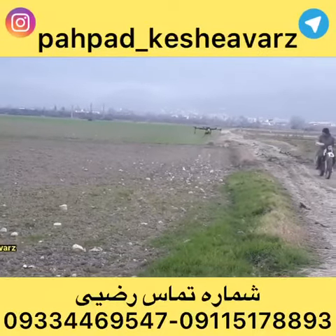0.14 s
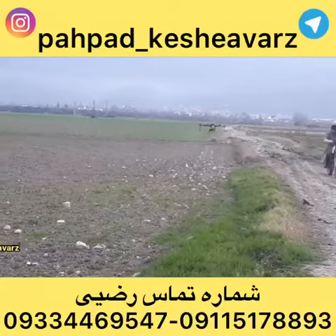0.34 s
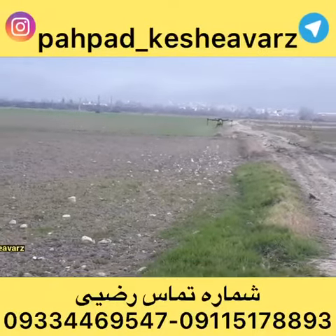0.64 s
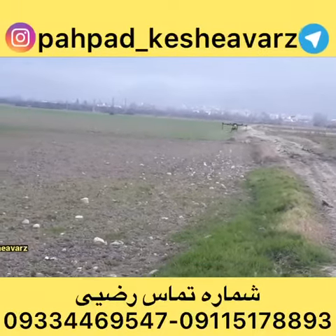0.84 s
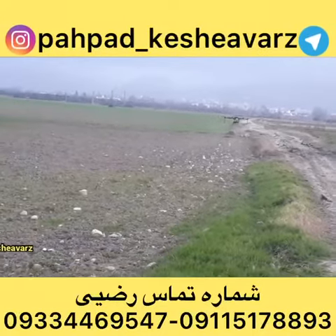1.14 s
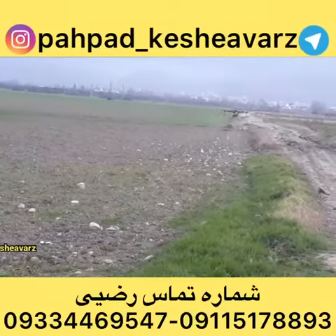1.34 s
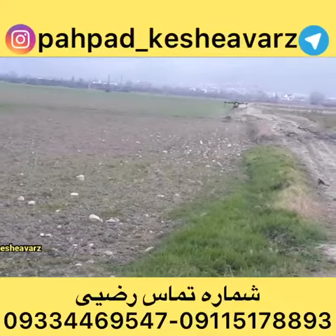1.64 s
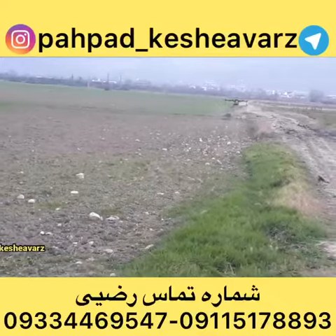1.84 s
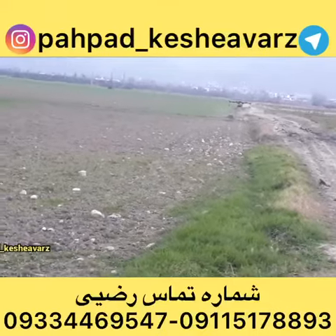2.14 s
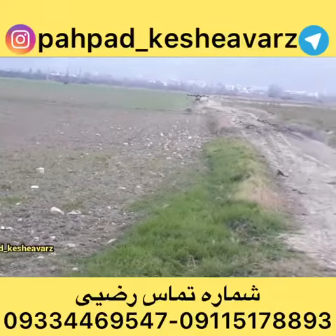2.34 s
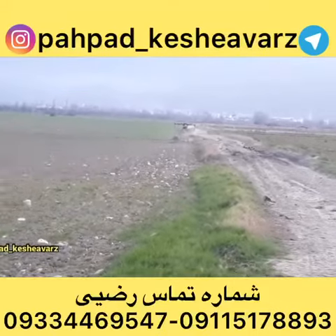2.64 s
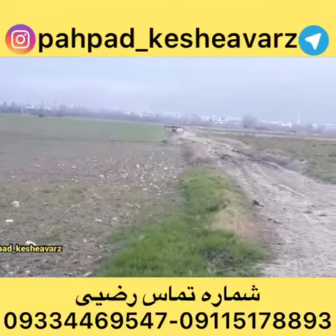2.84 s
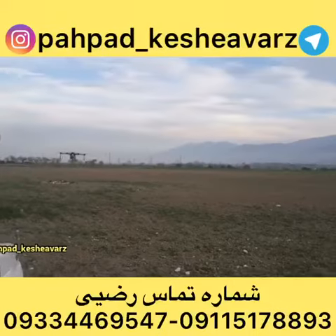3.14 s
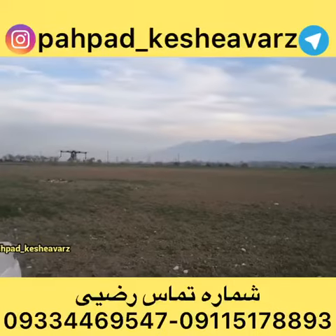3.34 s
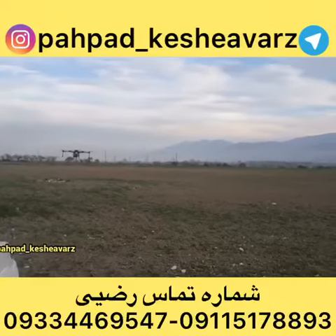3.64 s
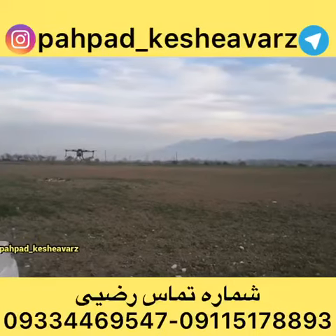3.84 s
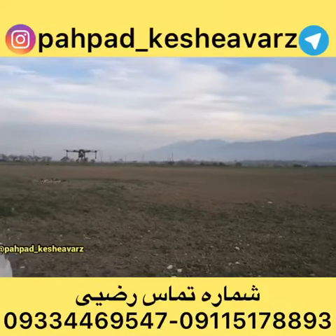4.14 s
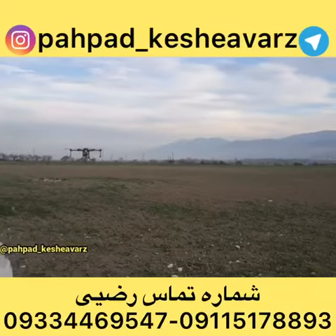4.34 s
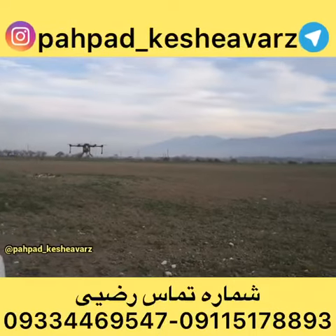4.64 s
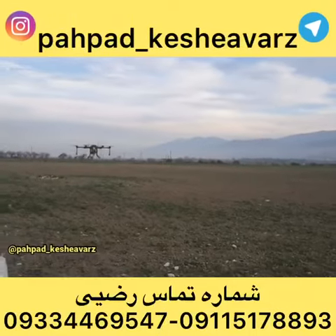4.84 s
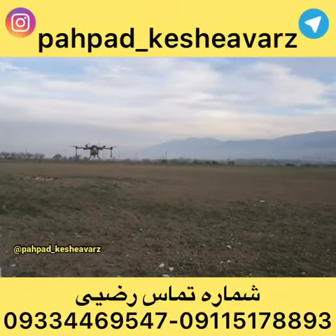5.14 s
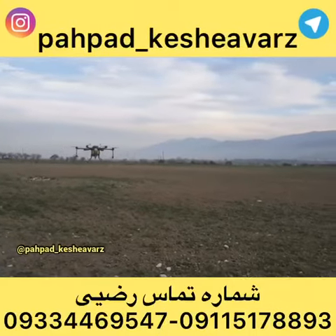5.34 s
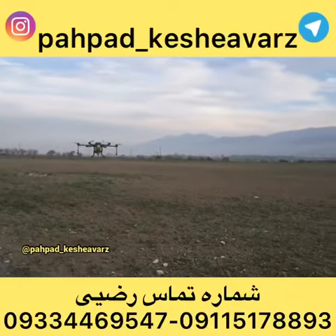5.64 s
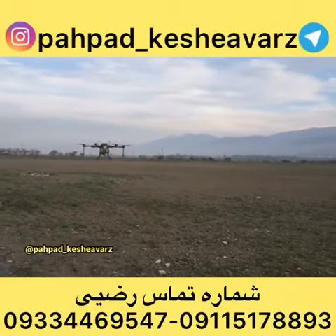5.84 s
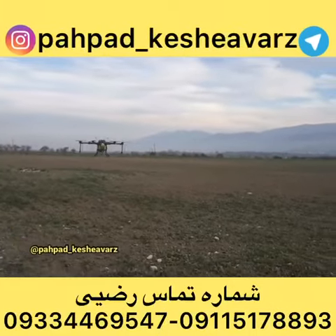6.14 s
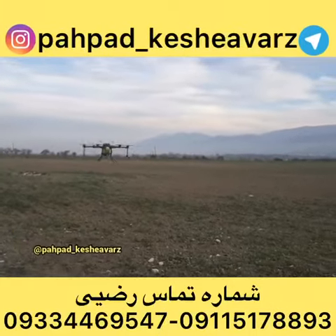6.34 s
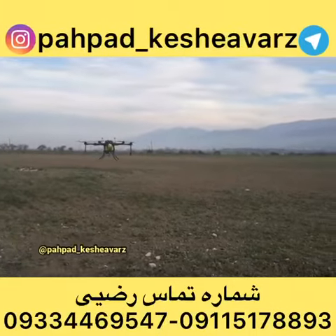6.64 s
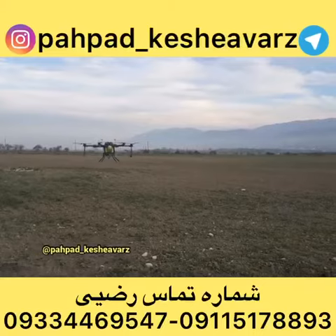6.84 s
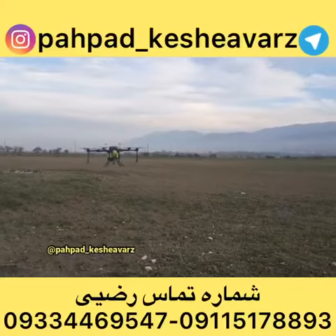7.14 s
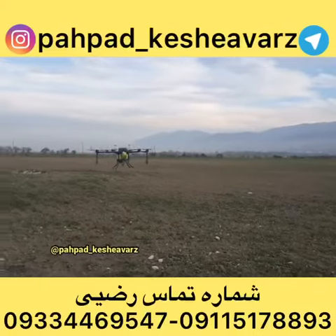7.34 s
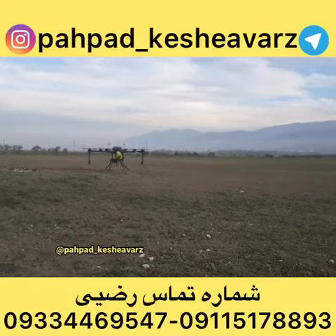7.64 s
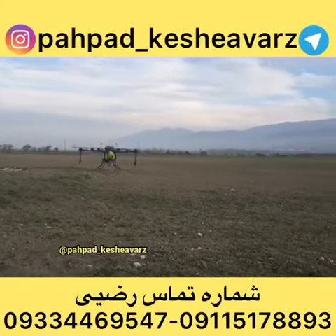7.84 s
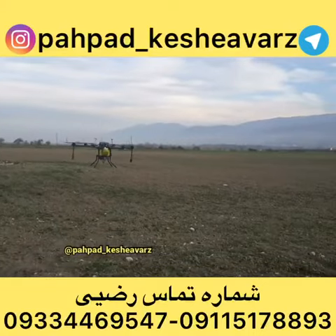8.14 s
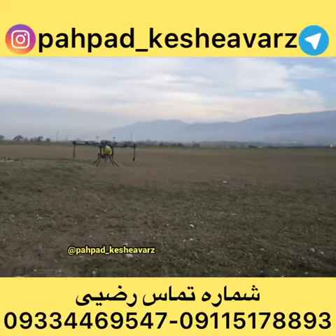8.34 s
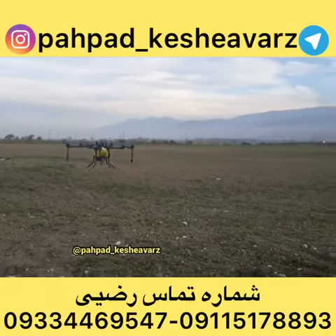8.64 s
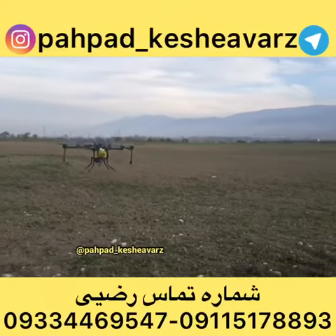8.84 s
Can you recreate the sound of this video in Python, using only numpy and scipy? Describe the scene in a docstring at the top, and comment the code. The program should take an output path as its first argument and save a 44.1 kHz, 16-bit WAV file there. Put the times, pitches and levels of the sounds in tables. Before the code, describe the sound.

On open farmland a single-cylinder motorbike putters past at low revs over the hiss of a distant drone. Fingers knock and rub on the hand-held phone microphone. After about three seconds the sound cuts abruptly to a multirotor drone flying low. Its beating hum, chopping buzz and thin whistle grow steadily louder as it approaches, with a few more small handling knocks along the way.

```python
"""Open farmland, two scenes joined by a hard cut. First a single-cylinder motorbike putters past at low
revs, each firing ringing its silencer and tailpipe, over the hiss of a distant spraying drone. Then the
drone flies in low: its rotors beat against each other and their blades chop the air ever louder.
Fingers knock and rub on the hand-held phone that carries the microphone."""
import sys
import numpy as np
from scipy import signal
from scipy.fft import rfft, irfft, next_fast_len
from scipy.io import wavfile
from scipy.ndimage import uniform_filter1d, map_coordinates

SR = 44100
rng = np.random.default_rng(int(sys.argv[2]) if len(sys.argv) > 2 else 0)


def output_pcm(signal):
    """Save a mono or channel-first signal as 16-bit PCM at the path in sys.argv[1].

    Samples are clipped to [-1, 1] before scaling.
    """
    pcm = np.clip(np.atleast_2d(signal).T, -1, 1) * 32767
    wavfile.write(sys.argv[1], SR, np.round(pcm).astype(np.int16))


N = 396018
T = np.arange(N) / SR

# Rotor speed: time_s, blade_pass_hz
BLADE_RATE = [(2.9, 101.4), (3.5, 100.2), (4.4, 100.3), (5.3, 96.86), (5.8, 99.36), (6.3, 96.24),
              (6.65, 96.07), (7.15, 99.1), (7.5, 97.3), (7.8, 97.67), (8.35, 95.6), (8.7, 96.9),
              (8.98, 95.9)]
def near_drone():
    """The rotors hum, buzz and chop the air, over the downwash and the motors."""
    blade_hz, = curves(BLADE_RATE)
    rotors = rotor_spin(blade_hz)
    tone, passes, slaps = blades(rotors)
    hum = approach_gain(-43.5, slope=0.8, cap_db=-0.5) * beating(rotors, harmonic=1, others_db=-3.5)
    octave = approach_gain(-45, slope=1.14) * beating(rotors, harmonic=2, others_db=6)
    buzz = approach_gain(-37, slope=0.82, cap_db=4) * over_ground(tone)
    chop = np.sqrt(3.9 + passes)  # steady plus pulsed power
    air = blade_swish(chop, slaps) + top_hiss(chop) + downwash(passes)
    return hum + octave + buzz + air + motor_whine(blade_hz) + rotor_whistle()


# Front pair in antiphase: time_s
ANTIPHASE_S = [2.87, 3.22, 3.412, 3.6, 3.931, 4.17, 4.372, 4.632, 4.951, 5.168, 5.412, 5.686, 5.92, 6.18,
               6.62, 6.96, 7.35, 7.932, 8.55, 9]
# Other rotors, speed relative to the front pair: far_ratio, near_ratio, level_db
OTHER_ROTORS = [(.935, .985, -9), (0.989, 0.996, -13.5), (1.025, 1.04, -10.5), (1.05, 1.058, -7)]
def rotor_spin(blade_hz, front_db=(-5, -7), slowing_s=(5.2, 6.8)):
    """(blade_turns, level_db) per rotor: the front pair slip past each other, the rest hunt in speed."""
    mean_turns = np.cumsum(blade_hz * (1 + 0.002 * walk(8))) / SR
    slip = np.interp(T, ANTIPHASE_S, np.arange(len(ANTIPHASE_S))) + 0.5
    rotors = [(mean_turns + slip / 2, front_db[0]), (mean_turns - slip / 2, front_db[1])]
    for far_ratio, near_ratio, level_db in OTHER_ROTORS:
        hunt = 1 + 0.01 * walk(2.5) + 0.0015 * walk(25)
        rate_hz = blade_hz * np.interp(T, slowing_s, [far_ratio, near_ratio]) * hunt
        rotors.append((rng.random() + np.cumsum(rate_hz) / SR, level_db))
    return rotors


# Blade tone: harmonic, level_db
BLADE_HARMONICS = [(2, -6), (3, -1), (4, 0), (5, -2), (6, -3), (7, -8), (8, -2.5), (9, -4), (11, -8.5),
                   (13, -11.5), (16, -15)]
def blades(rotors, sharpness=7, gust_db=2):
    """Tone, hiss power and vortex slaps of the passing blades, summed over the rotors."""
    harmonics = np.arange(2, 17)
    gains = undb(np.interp(harmonics, *np.transpose(BLADE_HARMONICS)))
    cycle = np.arange(2048) / 2048
    # A blade hisses most as it swings towards the listener.
    pulse = np.exp(sharpness * (np.cos(2 * np.pi * cycle) - 1))
    tone, passes, slaps = 0, 0, 0
    for turns, level_db in rotors:
        index = (turns % 1 * len(cycle)).astype(int)
        offset_turns = 0.12 * rng.standard_normal((len(harmonics), 1))
        wave = gains @ np.sin(2 * np.pi * (np.outer(harmonics, cycle) + offset_turns))
        tone += undb(level_db + 2.2 * walk(14)) * wave[index]
        gust = undb(0.78 * level_db + gust_db * walk(14))
        passes += gust ** 2 * pulse[index]
        # It cuts the same tip vortex on every pass, so the slap repeats and rasps.
        slap = np.sqrt(pulse) * uniform_filter1d(rng.standard_normal(len(cycle)), size=8)
        slaps += gust * unit(slap)[index]
    return unit(tone), passes / passes.mean(), unit(slaps)


def beating(rotors, harmonic, others_db):
    """One partial per rotor; unequal speeds make the sum swell and cancel."""
    partials = [undb(level_db) * np.sin(2 * np.pi * harmonic * turns) for turns, level_db in rotors]
    return unit(sum(partials[:2]) + undb(others_db) * sum(partials[2:]))


# Swish spectrum, distant: freq_hz, level_db
SWISH_DISTANT = [(650, -30), (1100, -6), (1450, -5.5), (1900, -5.5), (2150, 0.5), (2450, -2), (2850, 0),
                 (3200, -3), (4350, -5), (4750, -15), (5400, -13.5), (5850, -17.5), (6300, -14.5),
                 (6750, -19.5), (7800, -28)]
# Swish spectrum, close: freq_hz, level_db
SWISH_CLOSE = [(650, -38), (1100, -16), (1250, -7.5), (1530, -12.5), (1900, -5.5), (2230, -6), (2750, -2),
               (3300, -4), (4400, -8.5), (4800, -11.5), (5600, -16), (6800, -27), (7800, -24)]
def blade_swish(chop, slaps, closing_s=(4.3, 5.6)):
    """Chopped hiss and slaps, fluttering in turbulent air."""
    rasp = unit(chop * noise()) + 0.4 * slaps
    flutter = undb(0.45 * walk(22))
    close = np.interp(T, closing_s, [0, 1])
    swish = (1 - close) * colour(rasp, SWISH_DISTANT) + close * colour(rasp, SWISH_CLOSE)
    return approach_gain(-27.5) * flutter * swish


# Downwash spectrum: freq_hz, level_db
DOWNWASH_SPECTRUM = [(30, -23.5), (70, -11.5), (140, -8), (250, -6), (440, -4), (600, -6.5), (800, -0.5),
                     (1050, -4.5), (1280, -8), (1600, -5.5), (2500, 0.5), (5000, -53.5)]
def downwash(passes):
    """A broad rush of air, pulsed by the blades."""
    rush = colour(np.sqrt(1.6 + passes) * noise(), DOWNWASH_SPECTRUM)
    return approach_gain(-32, cap_db=-3.5) * over_ground(rush)


# Whistle centre: time_s, pitch_hz
WHISTLE_PITCH = [(2.9, 2860), (4.1, 2860), (4.7, 2751), (5.5, 2757), (6.2, 2662), (6.7, 2605), (7.2, 2688),
                 (8, 2708), (8.98, 2737)]
def rotor_whistle(width_hz=150):
    """A narrow, breathy whistle of the rotors, drifting in pitch."""
    pitch_hz, = curves(WHISTLE_PITCH)
    breath = butter(noise() + 1j * noise(), width_hz / 2)
    whistle = unit(np.real(breath * np.exp(2j * np.pi * np.cumsum(pitch_hz) / SR)))
    return approach_gain(-39, slope=0.72) * undb(1.3 * walk(9)) * whistle


# Top hiss spectrum: freq_hz, level_db
TOP_SPECTRUM = [(4500, -30), (6300, -3), (7200, -7), (7900, -4), (8500, 0), (9100, -1)]
def top_hiss(chop, opening_s=(3.31, 4.2), shut_db=-80, open_db=-43):
    """A high hiss, probably the spray nozzles, opens once and holds."""
    level_db = np.interp(T, opening_s, [shut_db, open_db]) + 1.7 * walk(16)
    return undb(level_db) * colour(chop * noise(), TOP_SPECTRUM)


# Whine, strongest as the drone leans forward: time_s, level_db
WHINE_LEVEL = [(2.9, -65), (3.7, -56), (4.3, -52), (4.7, -46), (5.4, -50), (6.2, -57), (8.98, -52)]
def motor_whine(blade_hz):
    """The magnet poles whine at seven times the blade rate."""
    level_db, = curves(WHINE_LEVEL)
    turns = 7 * np.cumsum(blade_hz * (1 + 0.006 * walk(16))) / SR
    return undb(level_db) * unit(np.sin(2 * np.pi * turns) * undb(1.6 * walk(16)))


# Drone's approach: time_s, nearness_db
NEARNESS = [(2.9, -15.5), (3.45, -11.5), (3.95, -9), (4.3, -10), (4.6, -8), (5.1, -4.5), (5.45, -1.5),
            (5.72, -1.7), (6, -3), (6.4, -2.5), (6.98, 1.9), (7.3, -.5), (7.5, 0), (8.15, 0.7), (8.55, 3.5),
            (8.75, 5.5), (8.98, 5.5)]
def approach_gain(base_db, slope=1, cap_db=np.inf):
    """A layer grows with the drone's nearness, until the nearness reaches cap_db."""
    nearness_db, = curves(NEARNESS)
    return undb(base_db + slope * np.minimum(nearness_db, cap_db))


# Echo off the soil: time_s, lag_ms
GROUND_LAG = [(2.9, 0.94), (4.4, 1.06), (5.5, 1.33), (6.5, 1.45), (8.98, 1.58)]
def over_ground(direct):
    """The soil returns a dull, late copy that hollows the sound, less so at close range."""
    lag_ms, = curves(GROUND_LAG)
    echo = np.interp(T - lag_ms / 1000, T, butter(direct, 2200, order=1))
    share = 0.54 * np.interp(T, [4.5, 7], [1, 0.35])
    return unit(direct + share * echo)


# Engine speed: time_s, firing_hz
FIRING_RATE = [(0, 18.1), (.5, 19.7), (.75, 19.9), (1.15, 21), (1.9, 22.2), (2.3, 22.5), (2.5, 23.2),
               (2.9, 23.2)]
# Phone swinging past the motorbike: time_s, gain_db
SWING_GAIN = [(0, 0), (2, -1.2), (2.3, -1.5), (2.52, 0.5), (2.66, -1), (2.88, 1)]
# Exhaust gas spectrum: freq_hz, level_db
GAS_SPECTRUM = [(60, -24.5), (150, -11.5), (200, -14.5), (280, -10.5), (380, -14.5), (460, -29),
                (565, -19.5), (680, -25), (930, -19), (1060, -24.5), (1250, -22), (1420, -32.5),
                (1790, -21), (2400, -29), (4200, -31.5), (9000, -41)]
def motorbike():
    """Each firing thumps, barks and puffs; gas, ticks and upper resonances grow faster than the slowly rising
    thump."""
    firing_hz, = curves(FIRING_RATE)
    swing_db, = curves(SWING_GAIN)
    turns = np.cumsum(firing_hz) / SR + 0.002 * walk(20)
    puff = unit((0.38 + np.exp(-(turns % 1))) * noise())
    thump = ramp_gain(-35, 0.57) * silencer(turns, puff)
    bark = tailpipe(turns, puff)
    # The gas grows as the silencer turns towards the listener.
    gas = ramp_gain(-49, 4.97) * undb(0.05 * hand_shade_db()) * colour(puff, GAS_SPECTRUM)
    ticks = ramp_gain(-53.5, 3) * undb(hand_shade_db()) * valve_gear(turns)
    return undb(swing_db) * (thump + bark + gas + ticks)


# Gas pushes per engine cycle: phase_turns, level_db
GAS_PUSHES = [(-.1, 3), (0.057, 4.5), (0.199, -17)]
# Silencer resonances: freq_hz, width_hz, initial_db, rise_db_per_s
SILENCER_MODES = [(106.4, 16, -4, 0), (165.4, 29, 8, -2), (257, 35, -6.5, 3), (338, 40, -19.5, 2.5)]
def silencer(turns, puff, churn_db=-22):
    """Pushes of gas thump the silencer's low resonances."""
    pushes = sum(undb(db) * strokes(turns - phase, scatter_db=0.7) for phase, db in GAS_PUSHES)
    drive = unit(pushes) + undb(churn_db) * puff
    thump = sum(ramp_gain(db, rise) * ring(drive, hz, width) for hz, width, db, rise in SILENCER_MODES)
    return colour(thump, [(30, -37), (70, -13), (110, 4.5), (370, -6.5), (600, -30.5), (1500, -27)])


# Tailpipe resonances: initial_hz, width_hz, initial_db, rise_db_per_s
TAILPIPE_MODES = [(551, 39, -63, 4), (728, 40, -51.5, -.5), (825, 64, -65, 4.5), (1145, 62, -63, 3)]
def tailpipe(turns, puff, delay_turns=0.03, breath_db=-12, glide_per_s=0.021):
    """The sharp front of each firing rings the pipe with a hollow, slowly rising bark."""
    front = unit(strokes(turns - delay_turns, scatter_db=1.6)) + undb(breath_db) * puff
    bark = 0
    for initial_hz, width_hz, initial_db, rise_db_per_s in TAILPIPE_MODES:
        carrier = np.exp(2j * np.pi * np.cumsum(initial_hz * (1 + glide_per_s * T)) / SR)
        envelope = butter(front / carrier, width_hz / 2)
        bark += ramp_gain(initial_db, rise_db_per_s) * unit(np.real(envelope * carrier))
    return bark


# Cooling fin modes: freq_hz, width_hz, level_db
FIN_MODES = [(4280, 130, -4), (4520, 160, -10), (4830, 190, -5), (5080, 130, 3.5), (5240, 100, -5),
             (6870, 190, -13.5), (8340, 280, -17.5)]
def valve_gear(turns, strike_turns=0.1, decay_turns=0.19, rattle_db=-1, clatter_db=-11):
    """Once a cycle a tappet strikes the cylinder head and rattles; the cooling fins chink."""
    tappet_turns = turns - strike_turns
    rattle = unit((0.15 + np.exp(-(tappet_turns % 1) / decay_turns)) * noise())
    blow = unit(strokes(tappet_turns, scatter_db=1.2)) + undb(rattle_db) * rattle
    chink = sum(undb(db) * ring(ring(blow, hz, width), hz, 4 * width) for hz, width, db in FIN_MODES)
    clatter = colour(rattle, [(2000, -22), (3300, 2), (4500, -2.5), (5500, 1), (6800, 7), (9000, -5)])
    return unit(chink) + undb(clatter_db) * clatter


def hand_shade_db(start_s=2.425, depth_db=-26, attack_s=0.022, recovery_s=0.14):
    """A hand covers the microphone: the treble drops fast and creeps back."""
    since_s = np.maximum(T - start_s, 0)
    return depth_db * np.minimum(since_s / attack_s, 1) * np.exp(-since_s / recovery_s)


# Far rotor hiss spectrum: freq_hz, level_db
FAR_SPECTRUM = [(60, -12), (200, -1.5), (480, -12.5), (580, -12), (660, -4), (800, -7), (900, -9),
                (1080, -12.5), (1250, -11.5), (1400, -17), (1550, -8), (1800, -5), (2020, -10.5),
                (2400, 1.5), (2680, 1.5), (2950, -8), (3350, -6), (3850, -14), (4250, -9.5), (4800, -12.5),
                (6000, -14), (9000, -29)]
def far_drone(blade_hz=(94.5, 115), sharpness=5, fade_start_s=2.38, fade_db_per_s=62):
    """From afar only hiss carries, chopped at two blade rates; it fades as the phone swings away."""
    passes = 0
    for rate_hz in blade_hz:
        turns = np.cumsum(rate_hz * (1 + 0.01404 * walk(3.94))) / SR
        passes += np.exp(sharpness * (np.cos(2 * np.pi * turns) - 1))
    hiss = colour(noise() * np.sqrt(1 + 0.88 * passes), FAR_SPECTRUM)
    fade_db = fade_db_per_s * np.maximum(T - fade_start_s, 0)
    return ramp_gain(-37.5, 0.5) * undb(1.1 * walk(18) - fade_db) * hiss


# Knocks on the phone: start_s, level_db, pitch_hz, crack_relative_db
FINGER_KNOCKS = [(2.3641, -17, 260, -10), (2.3853, -20, 1500, -11), (2.404, -32, 600, -4),
                 (2.4068, -20, 260, -14), (2.416, -13, 1600, -10), (2.4186, -22, 600, -13),
                 (4.3285, -24, 378, -12), (4.3404, -17, 268, -27), (4.725, -22, 3500, -25)]
def knocks(slip_s=0.00019, case_hz=290, case_db=-12, case_t60_s=0.018, crack_t60_s=0.03):
    """A finger drags the case and lets go: a dead thud, a short crack and a low thump of the case."""
    track = np.zeros(N)
    lead_samples = 512
    t = np.arange(-lead_samples, 2048) / SR
    after_s = np.maximum(t, 0)
    case = undb(case_db - 60 * after_s / case_t60_s) * np.sin(2 * np.pi * case_hz * after_s)
    for start_s, level_db, pitch_hz, crack_db in FINGER_KNOCKS:
        thud = -np.tanh(t / slip_s) * np.exp(-2 * np.pi * pitch_hz * abs(t))
        dull_noise = unit(butter(rng.standard_normal(len(t)), 3000))
        crack = (t > 0) * undb(crack_db - 60 * after_s / crack_t60_s) * dull_noise
        first = int(start_s * SR) - lead_samples
        track[first:first + len(t)] += undb(level_db) * (thud / thud.max() + crack - case)
    return butter(track + 1e-18, 95, "high")


# Fingers sliding on the phone: centre_s, half_length_s, level_db
FINGER_RUBS = [(2.354, 0.011, -39), (2.395, 0.017, -32), (2.675, 0.13, -40.5), (4.212, 0.016, -46),
               (4.338, 0.012, -36.5), (4.486, 0.075, -38.5)]
def rubs():
    """Dry, thin scraping of skin on the case."""
    swell = sum(undb(level_db) * np.exp(-0.5 * ((T - centre_s) / half_length_s) ** 2)
                for centre_s, half_length_s, level_db in FINGER_RUBS)
    scrape = noise() * undb(3.2 * walk(200))
    return swell * colour(scrape, [(500, -1.5), (3000, -8), (6200, -5), (7300, -8), (8600, -9)])


def undb(db):
    """Decibels to gain."""
    return 10 ** (db / 20)


def ramp_gain(initial_db, rise_db_per_s):
    """Gain along a straight line in dB."""
    return undb(initial_db + rise_db_per_s * T)


def unit(x):
    """Scale to rms 1."""
    return x / np.sqrt(np.mean(x ** 2))


def curves(table):
    """Each column after the first, interpolated over time."""
    time_s, *columns = np.transpose(table)
    return [np.interp(T, time_s, column) for column in columns]


def noise():
    """White noise."""
    return rng.standard_normal(N)


def walk(rate_hz):
    """Smooth random drift, spread near 1."""
    knots = rng.standard_normal(1024)
    return map_coordinates(knots, [T[::64] * rate_hz], order=3, mode="wrap").repeat(64)[:N]


def strokes(turns, scatter_db):
    """One pulse of uneven size at each whole turn."""
    count = np.floor(turns)
    return np.diff(count, prepend=count[0]) * undb(scatter_db * noise())


def colour(x, spectrum):
    """Shape by (freq_hz, level_db) points; rms 1."""
    size = next_fast_len(N, True)
    freq_hz, level_db = np.transpose(spectrum)
    bin_hz = np.maximum(np.arange(size // 2 + 1) * SR / size, 1)
    gain = undb(np.interp(np.log(bin_hz), np.log(freq_hz), level_db))
    return unit(irfft(rfft(x, size) * gain, size)[:N])


def ring(x, freq_hz, width_hz):
    """One resonance, gain 1 at its centre."""
    return signal.lfilter(*signal.iirpeak(freq_hz, freq_hz / width_hz, fs=SR), x)


def butter(x, cutoff_hz, kind="low", order=2):
    """Low-pass or high-pass filter."""
    return signal.sosfilt(signal.butter(order, cutoff_hz, kind, fs=SR, output="sos"), x)


def scene(cut_s=2.879):
    """The motorbike and far drone cut straight to the drone's approach."""
    before = np.clip((cut_s - T) / 0.0001, 0, 1)
    farmland = before * (motorbike() + far_drone()) + (1 - before) * near_drone()
    return (farmland + knocks() + rubs())[None]


def record(dry, bass_hz=45, ceiling=0.36, top_hz=9050):
    """The loudest peaks are softly rounded; deep bass and top are cut."""
    thinned = butter(dry, bass_hz, "high")
    rounded = thinned / (1 + (thinned / ceiling) ** 4) ** 0.25
    return signal.sosfilt(signal.ellip(12, 0.2, 90, top_hz, fs=SR, output="sos"), rounded)


dry = scene()
out = record(dry)
output_pcm(out)
```